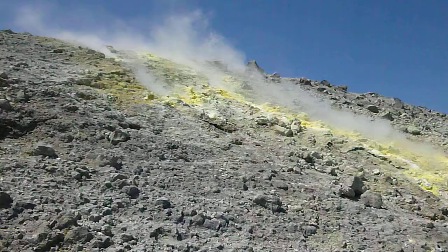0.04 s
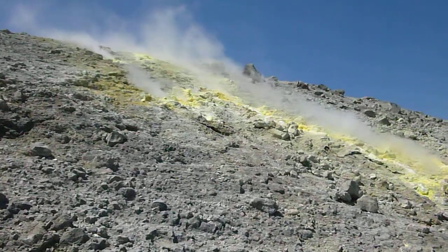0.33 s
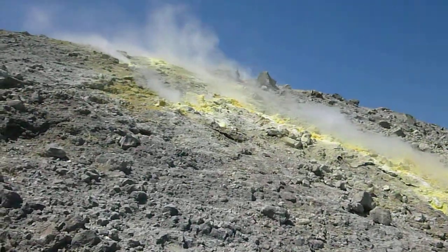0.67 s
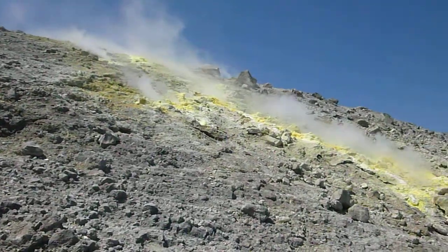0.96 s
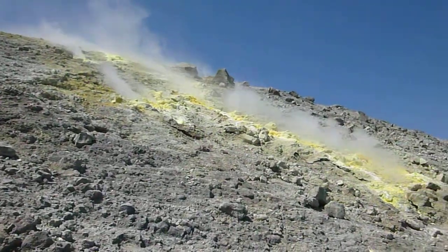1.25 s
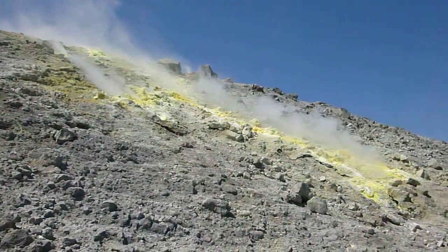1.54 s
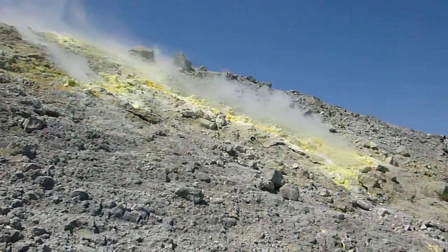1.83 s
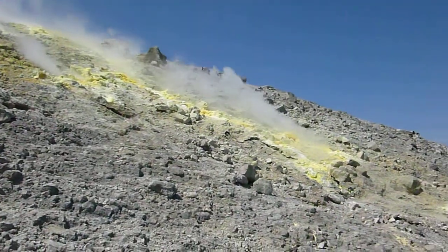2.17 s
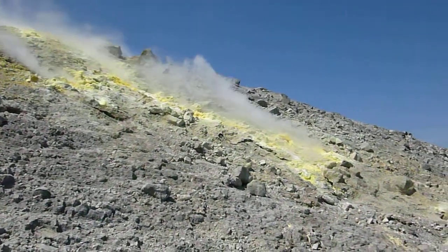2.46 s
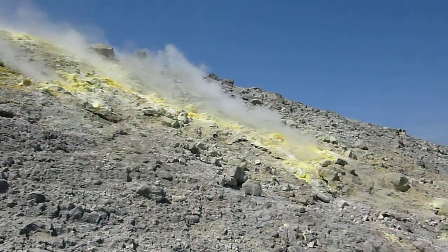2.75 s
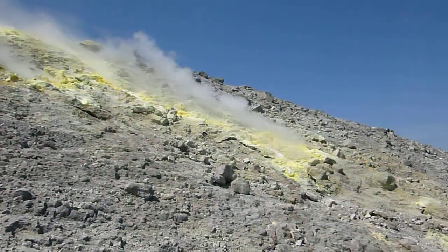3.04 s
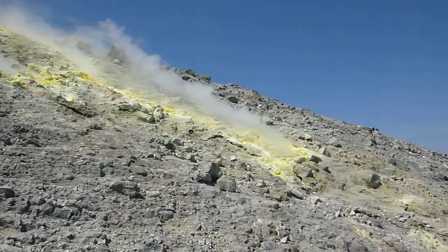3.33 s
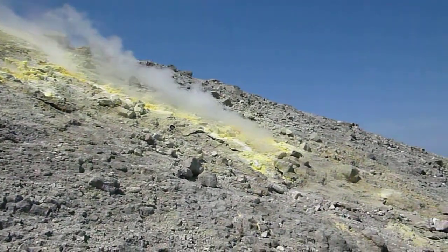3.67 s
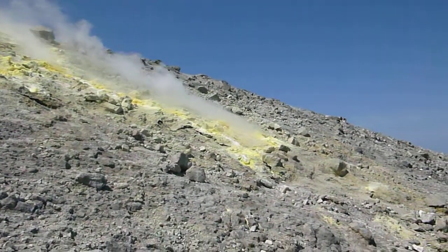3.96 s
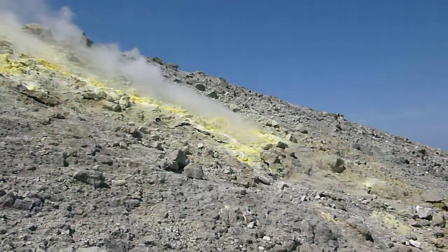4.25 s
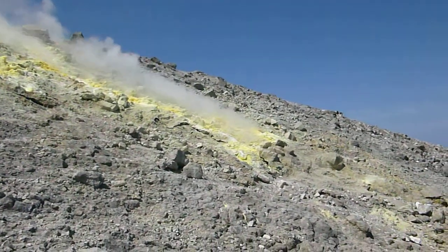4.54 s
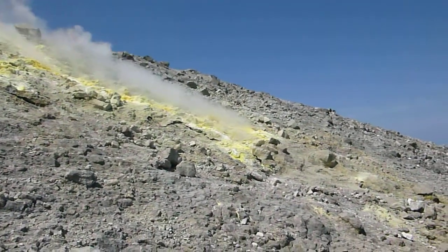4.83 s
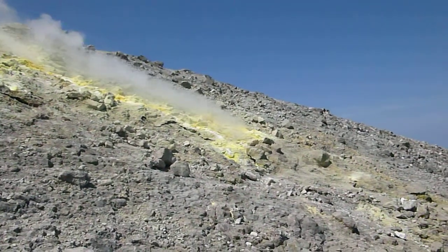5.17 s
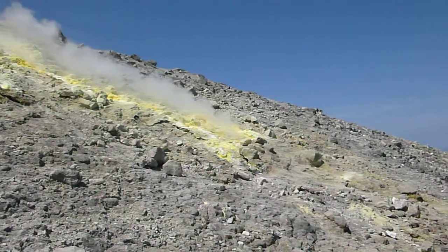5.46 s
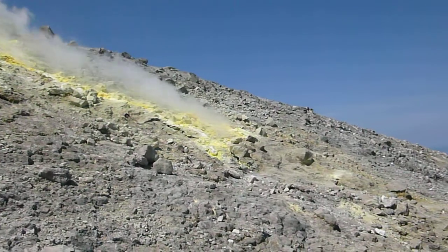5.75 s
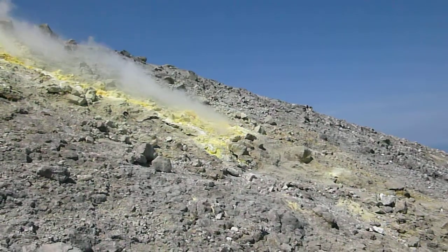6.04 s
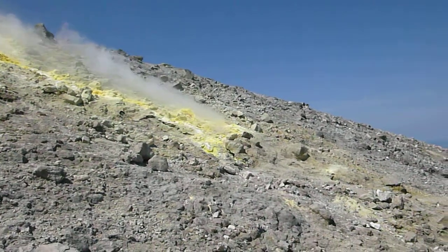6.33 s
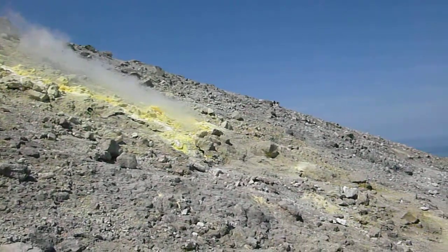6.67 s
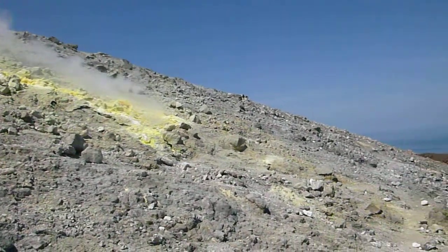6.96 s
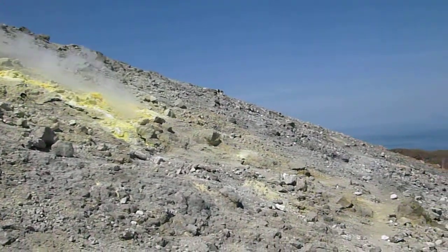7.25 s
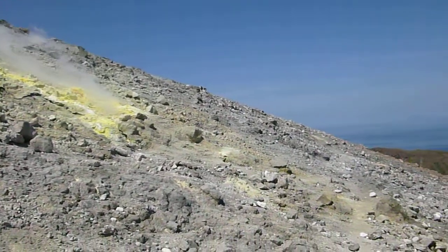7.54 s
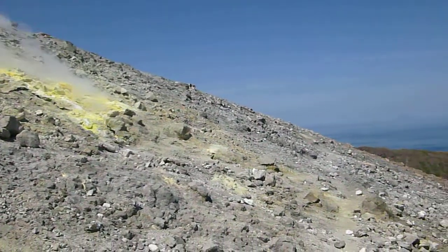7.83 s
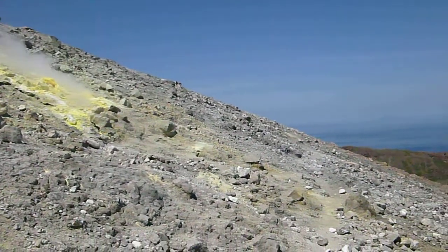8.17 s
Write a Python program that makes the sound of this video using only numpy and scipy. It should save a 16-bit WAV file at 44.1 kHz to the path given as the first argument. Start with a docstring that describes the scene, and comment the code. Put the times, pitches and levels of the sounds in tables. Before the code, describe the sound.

Outdoors on a bare volcanic slope, gas escapes through rock with an uneven, hollow sputter, short spits and brief dropouts, above a faint even hiss. Wind sits right on the handheld microphone: it opens with a burst of distorted low thumps, the loudest moment, then continues as gusty rumble that gradually weakens. Fingers tick and rub on the case in the first second, with one more tick late on.

```python
"""Sulphur vents hiss and sputter on a bare slope, heard from a handheld camera out in the wind.
The gas jet flutters through the resonances of its rock throat, puffing and choking over the
fine hiss of the vent field. Right at the microphone, eddies rumble and thump on the diaphragm.
The microphone opens into a gust that overloads it; a hand rubs and ticks on the case."""
import sys
import numpy as np
from scipy import signal
from scipy.fft import rfft, irfft
from scipy.io import wavfile

SR = 44100
rng = np.random.default_rng(int(sys.argv[2]) if len(sys.argv) > 2 else 0)


def file_out(sig):
    """Save sig as 16-bit WAV at sys.argv[1]."""
    # one column per channel
    cols = np.atleast_2d(sig).T
    # limit, then scale
    lim = np.clip(cols, -1, 1)
    pcm = np.round(lim * 32767).astype(np.int16)
    wavfile.write(sys.argv[1], SR, pcm)


N = 366030
T = np.arange(N) / SR
HZ = np.linspace(0, SR / 2, 4097)

# hiss of the whole vent field: (time [s], level [dB])
HISS_LEVEL = [(0.1, -63), (0.8, -59), (2.2, -57.5), (8.3, -57)]
# its spectrum: (frequency [Hz], relative gain [dB])
HISS_COLOUR = [(300, 11), (700, 12), (1300, 6.5), (2100, 5), (2700, 3.5), (3600, -0.5), (5000, -4),
               (6500, -5.5), (7400, -9), (8000, -14), (8600, -29.5)]
# breeze at the microphone: (time [s], relative level [dB])
BREEZE = [(0.5, -33.5), (0.95, -43), (1.9, -44.5), (2.2, -39.5), (3.2, -47), (3.7, -46.5), (4.0, -41.5),
          (5.2, -41.5), (6.3, -45.5), (6.7, -52), (8.3, -51.5)]
# short gusts above the breeze: (time [s], length [s], relative level [dB])
GUSTS = [(0.66, 0.13, -37), (0.863, 0.056, -37.5), (1.122, 0.082, -33), (1.226, 0.03, -37),
         (1.307, 0.037, -32), (1.568, 0.031, -42), (1.75, 0.043, -29), (2.063, 0.23, -35),
         (2.355, 0.049, -30), (2.626, 0.076, -35), (2.918, 0.17, -33.5), (3.869, 0.13, -32.5),
         (4.067, 0.071, -34), (6.088, 0.1, -37.5), (7.172, 0.1, -44)]
# spectra of deep and fine eddies on the diaphragm: (frequency [Hz], relative gain [dB])
DEEP_EDDIES = [(10, -11), (25, -2.5), (55, 1), (120, 1.5), (200, -5), (300, -11.5), (450, -18.5),
               (700, -30), (1500, -50), (4000, -77.5)]
FINE_EDDIES = [(30, -19.5), (90, -3.5), (150, 3), (250, 0.5), (380, -8.5), (550, -15), (800, -30),
               (1500, -52), (4000, -68.5)]
# single eddies hit the microphone: (time [s], envelope peak [dB], frequency [Hz])
THUMPS = [(0.075, -16.5, 134), (0.083, -9.5, 205), (0.096, -8, 172), (0.104, -7, 145), (0.15, -23.5, 330),
          (0.163, -15.5, 201), (0.208, -6, 163), (0.219, -7.5, 160), (0.242, -10.5, 137),
          (0.251, -11.5, 280), (0.265, -12, 220), (0.274, -3.5, 230), (0.37, -14.5, 166),
          (0.622, -26.5, 109), (1.088, -23, 180), (1.214, -24.5, 206), (1.574, -21, 168),
          (1.69, -23.5, 133), (1.752, -20.5, 180), (1.764, -23.5, 241), (2.01, -24.5, 205),
          (2.141, -23, 274), (2.869, -27, 133)]
# the case ticks and creaks: (time [s], level [dB], decay [s], tilt [dB/octave])
TICKS = [(0.103, -26, 0.00034, 0), (0.206, -38, 0.00022, 4), (0.275, -20.5, 0.00022, 3.5),
         (0.3587, -13, 0.0001, 3.5), (0.3632, -22, 0.00016, -2), (0.621, -36, 0.0027, -4),
         (0.677, -43, 0.0031, 5), (0.699, -38, 0.0015, 9.5), (0.702, -28, 0.0021, 0.5),
         (0.708, -31, 0.0011, -3), (0.728, -27, 0.0012, -11), (0.7325, -22.5, 0.0026, -5),
         (0.8125, -25.5, 0.0016, 2), (6.842, -29, 0.0069, -6.5)]
# fingers slide on the case: (time [s], length [s], level [dB], tilt [dB/octave])
RUBS = [(0.349, 0.037, -56, 15.5), (0.357, 0.018, -42, 6.5), (0.375, 0.013, -38, -7),
        (0.488, 0.11, -50.5, -1.5), (0.623, 0.11, -62.5, 11.5), (0.701, 0.021, -34, -10.5),
        (0.73, 0.03, -43.5, 2)]
# what the case passes to the microphone: (frequency [Hz], relative gain [dB])
CASE_COLOUR = [(30, -67), (200, -17), (500, -1), (850, 8), (1350, 9.5), (1700, 2.5), (2200, -1.5),
               (3200, -10.5), (4500, -19.5), (6500, -30), (8500, -58)]
# strength of the jet in the throat: (time [s], relative level [dB])
JET_LEVEL = [(0.42, -55.5), (0.82, -52), (1.05, -43), (1.7, -46.5), (1.98, -41.5), (3.1, -41.5),
             (3.3, -44.5), (4.4, -44.5), (4.8, -40.0), (5.22, -44.5), (5.45, -41.5), (5.85, -40.5),
             (6.08, -49.5), (6.38, -42.5), (6.7, -49), (7.25, -48), (7.58, -41), (8.3, -44.5)]
# resonances of the rock throat: (frequency [Hz], width [Hz], relative gain [dB])
THROAT_MODES = [(767, 91, -3.5), (863, 168, 3.5), (1038, 210, -4), (1173, 170, -4.5), (1290, 153, 0.5),
                (1497, 190, -8.5), (1625, 182, -6), (1810, 160, -17.5), (1950, 140, -18), (2550, 1900, -31)]
# the jet spits hard: (time [s], length [s], relative level [dB])
PUFFS = [(0.903, 0.03, -40), (1.451, 0.012, -37), (2.149, 0.014, -32), (2.291, 0.012, -32),
         (2.562, 0.015, -33), (2.682, 0.024, -33), (2.961, 0.013, -33), (3.069, 0.014, -32),
         (3.377, 0.018, -35), (3.419, 0.03, -35.5), (3.58, 0.012, -37), (4.042, 0.028, -33),
         (4.842, 0.025, -33), (4.893, 0.014, -35), (5.005, 0.013, -34), (5.469, 0.018, -33),
         (5.693, 0.014, -32), (5.794, 0.029, -35), (6.395, 0.035, -35), (6.652, 0.028, -38),
         (6.824, 0.012, -37), (6.846, 0.018, -29.5), (6.975, 0.04, -39), (8.14, 0.025, -35)]
# the jet chokes: (time [s], length [s], depth [dB])
CHOKES = [(0.935, 0.018, -15), (1.356, 0.013, -21), (2.332, 0.11, -8), (2.776, 0.025, -2.5),
          (3.317, 0.023, -18), (3.554, 0.038, -40), (5.737, 0.04, -9.5), (6.69, 0.081, -21),
          (7.042, 0.062, -22), (7.124, 0.015, -28), (7.488, 0.041, -13)]
# the hollow note of a hard puff: (frequency [Hz], width [Hz], relative gain [dB])
PUFF_MODE = [(1027, 230, 0)]


def undb(db):
    """Decibels to gain."""
    return 10 ** (np.asarray(db) / 20)


def unit(x):
    """Scale to rms 1."""
    return x / np.sqrt(np.mean(x ** 2))


def curve(rows):
    """Rows of (time, value) joined by straight lines."""
    return np.interp(T, *np.transpose(rows))


def swell(s, length):
    """A bell curve centred on time s, `length` wide at half height."""
    bell = np.zeros(N)
    near = slice(max(int((s - 2 * length) * SR), 0), int((s + 2 * length) * SR))
    bell[near] = .5 ** ((2 * (T[near] - s) / length) ** 2)
    return bell


def wander(hz, size=16384):
    """Smooth random drift with spread 1 that changes about `hz` times a second."""
    bins_hz = np.arange(size // 2 + 1) * SR / N
    slow = irfft(rfft(rng.standard_normal(size)) / (1 + (bins_hz / hz) ** 2))
    return np.interp(T, np.linspace(0, T[-1], size), unit(slow))


def through(x, gain):
    """Minimum-phase filter shaped by `gain` at the frequencies HZ; white noise keeps its power."""
    cepstrum = irfft(np.log(gain))
    half = len(cepstrum) // 2
    cepstrum[1:half] *= 2
    cepstrum[half + 1:] = 0
    response = irfft(np.exp(rfft(cepstrum)))[:half]
    return signal.oaconvolve(x, response / np.linalg.norm(response))[:len(x)]


def colour(x, points, tilt_db=0):
    """Filter through (frequency [Hz], gain [dB]) points, tilted by `tilt_db` per octave."""
    hz, db = np.transpose(points)
    gain_db = np.interp(np.log2(HZ + 1), np.log2(hz), db + tilt_db * np.log2(hz))
    return through(x, undb(gain_db))


def resonate(x, modes):
    """Broad resonances with steep skirts."""
    power = sum(undb(db) ** 2 / (1 + 2 * ((HZ - hz) / width) ** 2) ** 4 for hz, width, db in modes)
    return through(x, np.sqrt(power))


def add(out, s, sound):
    """Mix a sound in at time s."""
    start = int(s * SR)
    out[start:start + len(sound)] += sound[:N - start]


def field_hiss(flicker_db=0.54):
    """Gas from many small cracks across the slope blends into a smooth hiss."""
    hiss = colour(rng.standard_normal(N), HISS_COLOUR)
    return hiss * undb(curve(HISS_LEVEL) + flicker_db * wander(hz=18))


def wind_strength(breeze_trim_db=1, wander_db=1.5, blast_db=-23.5, hold_s=0.29, fall_db_per_s=64):
    """The strongest of breeze, gusts and an opening blast that holds and dies away, in dB."""
    breeze = undb(curve(BREEZE) + breeze_trim_db + wander_db * wander(hz=9))
    blast = undb(blast_db - fall_db_per_s * np.maximum(T - hold_s, 0))
    gusts = sum(undb(db) * swell(s, length) for s, length, db in GUSTS)
    return 20 * np.log10(np.max([breeze, blast, gusts], axis=0))


def wind_rumble(usual_db=-38, deep_db=-1.5, fine_db=-4.5, buffet_db=4.5):
    """Eddies press on the diaphragm; in a gust the fine ones grow faster than the deep ones."""
    gust_db = wind_strength() - usual_db
    deep_rise_db = 0.53 * gust_db
    fine_rise_db = np.minimum(1.53 * gust_db, gust_db + 1)  # at most 1 dB ahead of the gust
    deep = colour(rng.standard_normal(N), DEEP_EDDIES) * undb(deep_db + deep_rise_db)
    buffets = unit(undb(buffet_db * wander(hz=45)))
    fine = colour(buffets * rng.standard_normal(N), FINE_EDDIES) * undb(fine_db + fine_rise_db)
    return undb(usual_db) * (deep + fine)


def wind_thumps(decay_cycles=0.33, steepness=0.5, size=4096):
    """Each large eddy swings the pressure at the microphone for a cycle or two, one flank steep."""
    out = np.zeros(N)
    t = (np.arange(size) - size // 2) / SR
    for s, db, hz in THUMPS:
        phase = 2 * np.pi * (hz * t + rng.random())
        swing = np.sin(phase + steepness * np.sin(phase))
        add(out, s + t[0], undb(db) * swing / np.cosh(hz * t / decay_cycles))
    return out


def handling_noise(size=8192):
    """Small rough contacts and sliding fingers reach the microphone through the case."""
    out = np.zeros(N)
    for s, db, decay, tilt_db in TICKS:
        push = np.exp(-T[:size] / decay)
        tick = colour(push * rng.standard_normal(size), CASE_COLOUR, tilt_db)
        add(out, s, undb(db) * unit(tick) * np.sqrt(np.mean(push ** 2)))
    for s, length, db, tilt_db in RUBS:
        slips = unit(rng.laplace(size=N))
        out += undb(db) * colour(swell(s, length) * slips, CASE_COLOUR, tilt_db)
    return out


def sputter(per_s=4, typical_s=0.008, surge_db=2, gap_db=-21, surge_share=0.4):
    """The gas surges or cuts out briefly at random moments; the change of level in dB."""
    change_db = np.zeros(N)
    for when, kind, size in rng.random((int(per_s * N / SR), 3)):
        db = surge_db if kind < surge_share else gap_db
        change_db += db * swell(when * N / SR, typical_s * (.5 + size))
    return change_db


def puff_ring(trim_db=-7):
    """Each hard puff of gas rings the same hollow note."""
    puffs = sum(undb(db + trim_db) * swell(s, length) for s, length, db in PUFFS)
    return resonate(puffs * rng.standard_normal(N), PUFF_MODE)


def gas_jet(trim_db=-0.1, puff_trim_db=-3, flutter_db=4, spit_db=1.5, start_s=0.36, rise_s=0.08):
    """Turbulent gas flutters, chokes and puffs, and rings the rock throat."""
    flutter = wander(hz=42)
    flutter -= 0.93 * np.abs(flutter)  # the flow collapses more readily than it overshoots
    turbulence = unit(undb(spit_db * wander(hz=130))) * rng.standard_normal(N)
    unsteadiness = unit(undb(flutter_db * flutter + sputter()))
    choke_db = sum(db * swell(s, length) for s, length, db in CHOKES)
    # the jet holds back for a moment before each puff
    hold_db = -6 * sum(swell(s - 0.014, length=0.014) for s, _, _ in PUFFS)
    flow = undb(curve(JET_LEVEL) + trim_db + choke_db + hold_db) * unsteadiness
    for s, length, db in PUFFS:  # a puff pulls the flow to its own level
        flow += swell(s, length) * (undb(db + puff_trim_db) - flow)
    fade_in = np.clip((T - start_s) / rise_s, 0, 1)
    return resonate(fade_in * flow * turbulence, THROAT_MODES)


def scene():
    """Wind and hand right at one microphone, and the vents out on the slope."""
    at_microphone = wind_rumble() + wind_thumps() + handling_noise()
    vents = field_hiss() + gas_jet() + puff_ring()
    return (at_microphone + vents)[None]


def record(dry, ceiling_db=-11, open_s=0.072, dc_offset=0.0123, top_hz=8700):
    """The microphone opens abruptly, overloads, sits slightly off zero and loses the high treble."""
    clipped = dry / (1 + (dry / undb(ceiling_db)) ** 6) ** (1 / 6)
    opened = (clipped + dc_offset) * (T >= open_s)
    lowpass = signal.ellip(8, .2, 70, top_hz, fs=SR, output="sos")
    return signal.sosfilt(lowpass, opened)


dry = scene()
out = record(dry)
file_out(out)
```